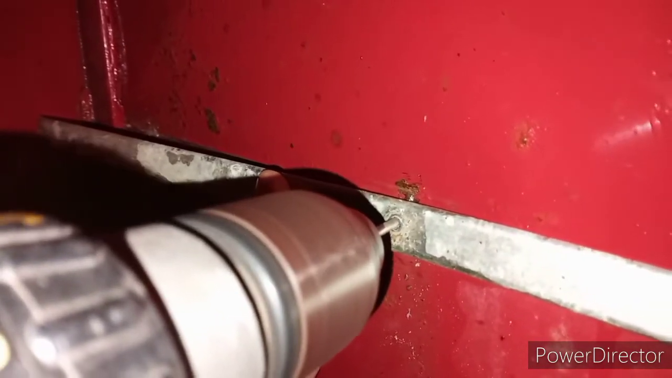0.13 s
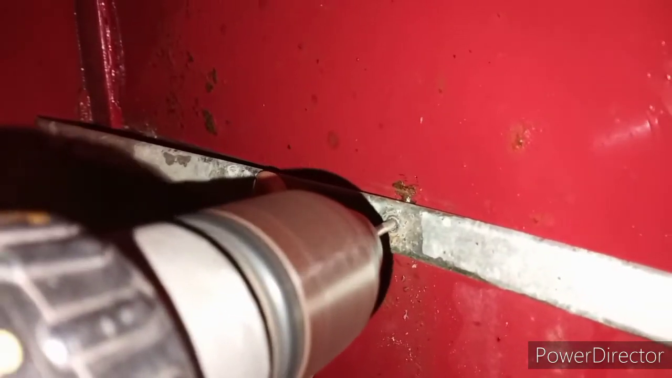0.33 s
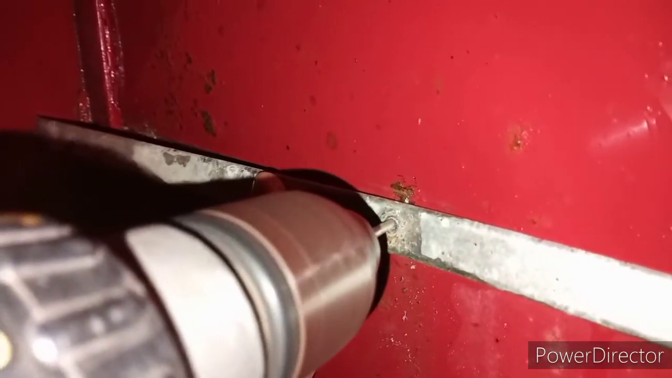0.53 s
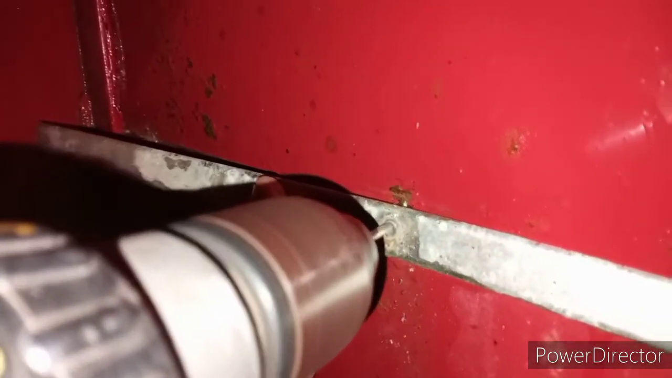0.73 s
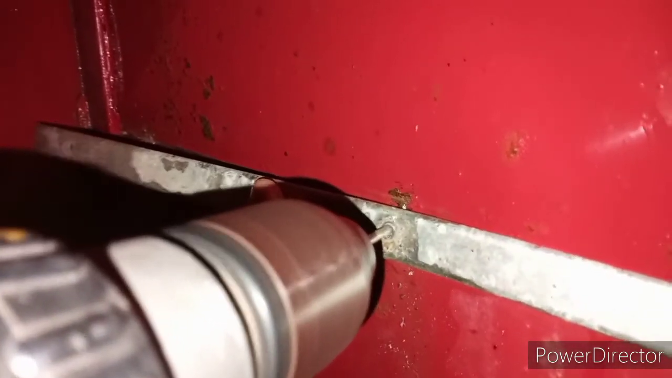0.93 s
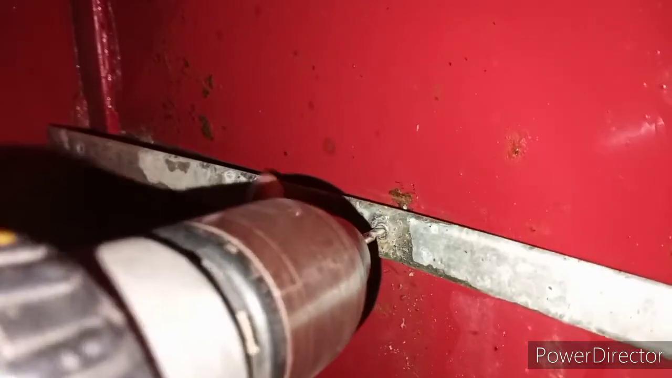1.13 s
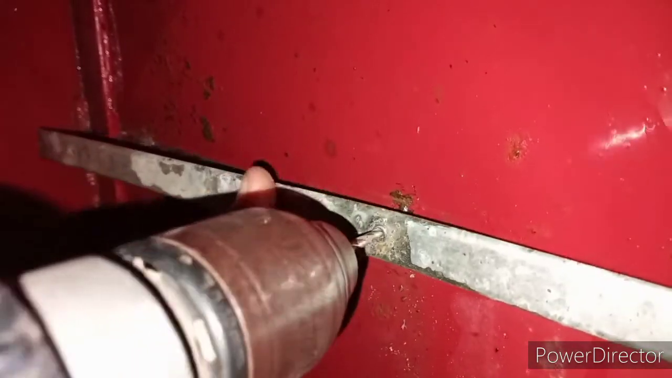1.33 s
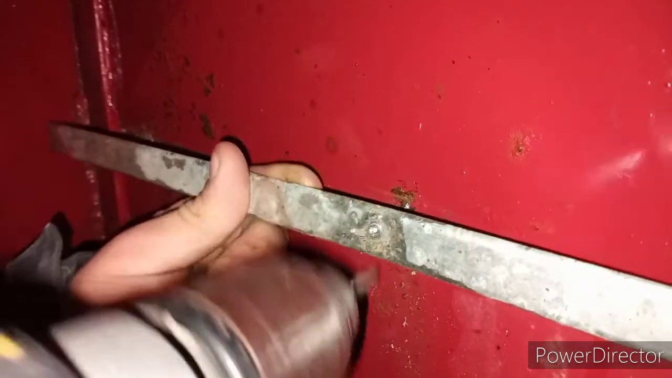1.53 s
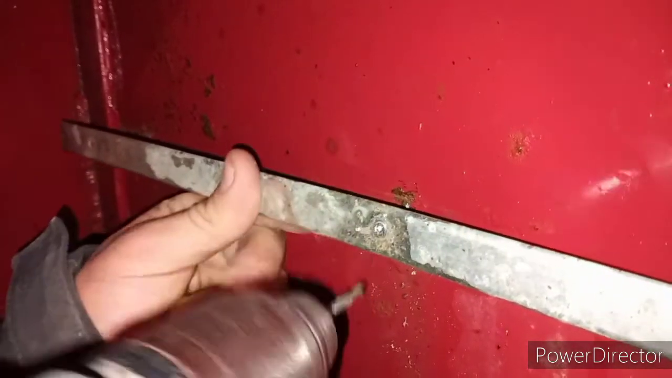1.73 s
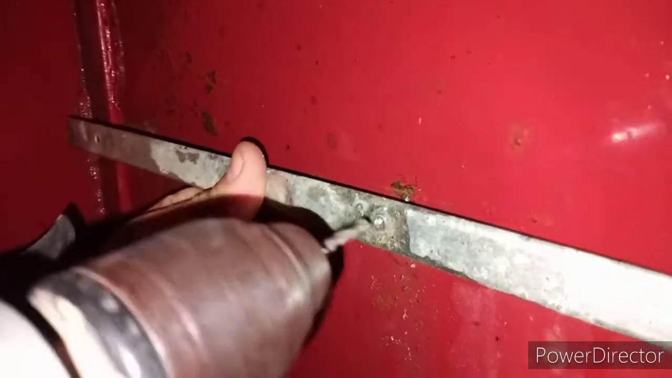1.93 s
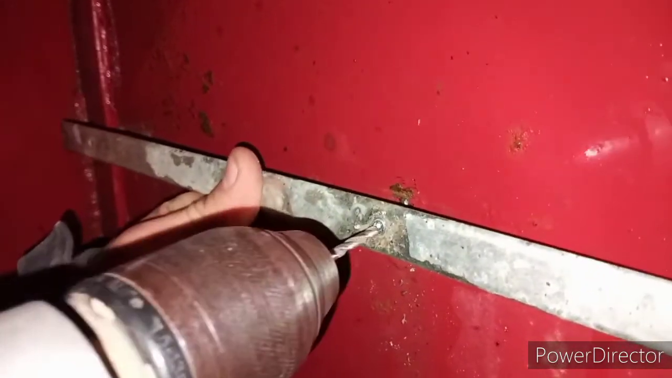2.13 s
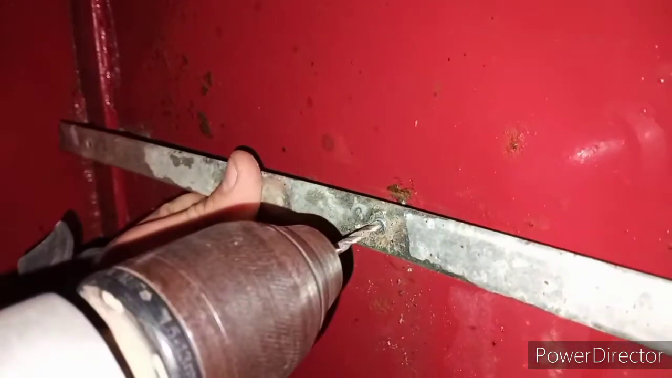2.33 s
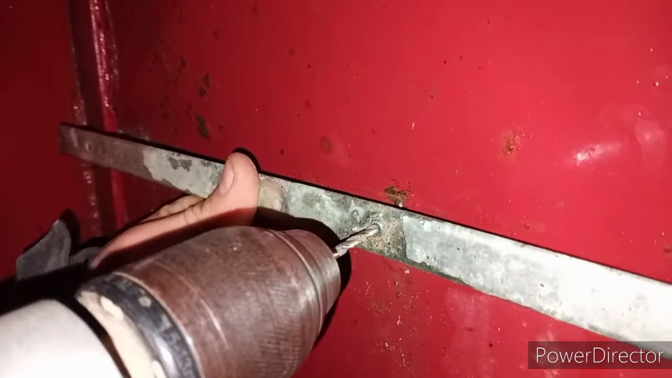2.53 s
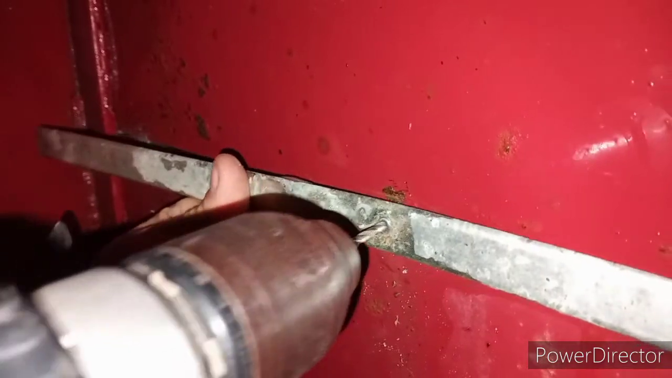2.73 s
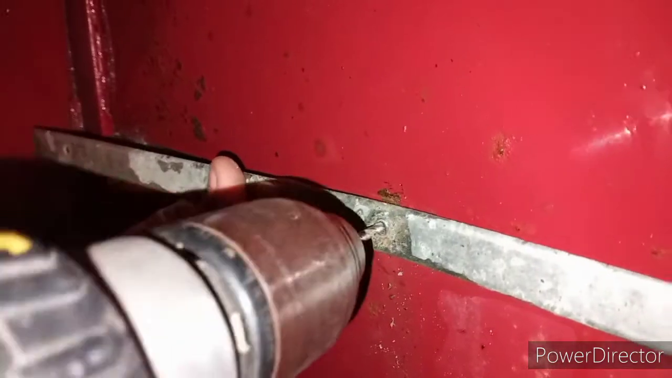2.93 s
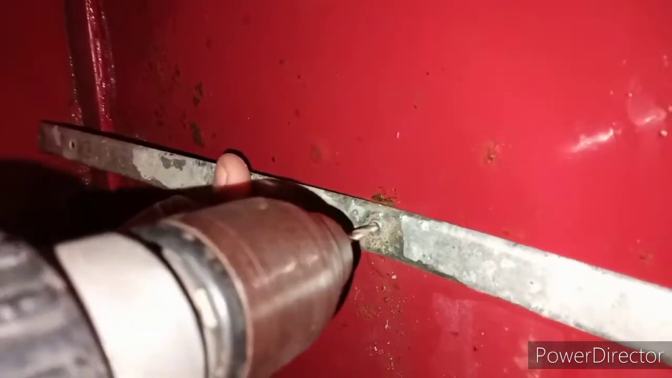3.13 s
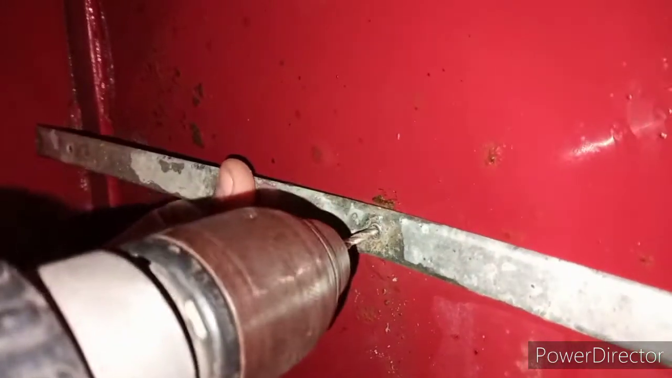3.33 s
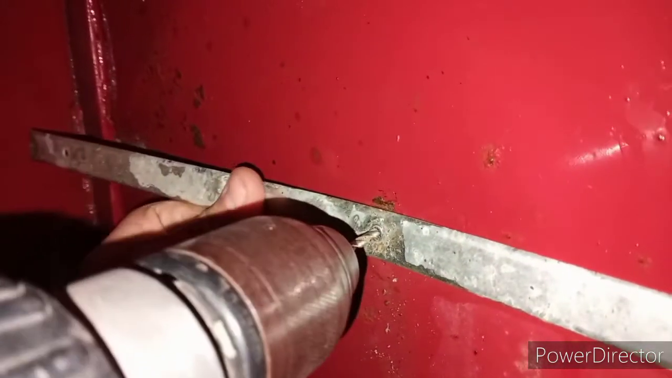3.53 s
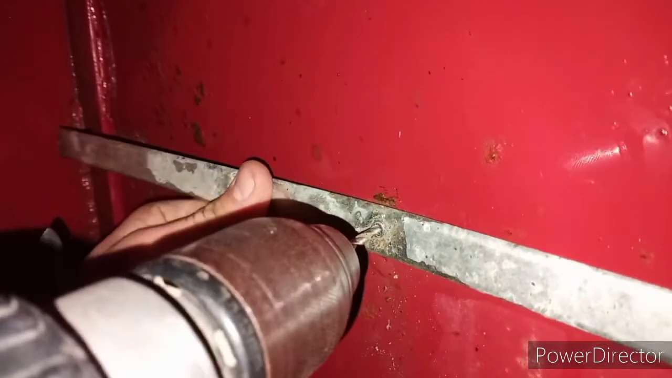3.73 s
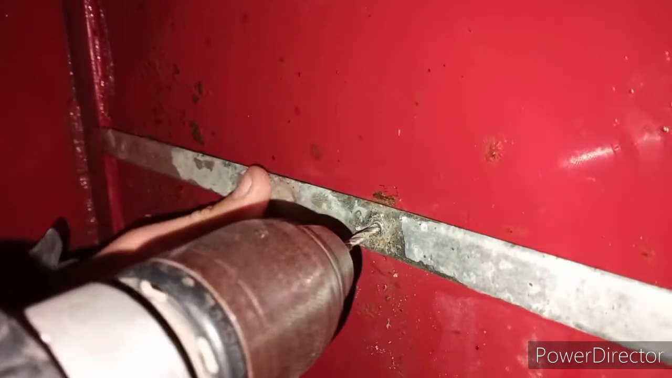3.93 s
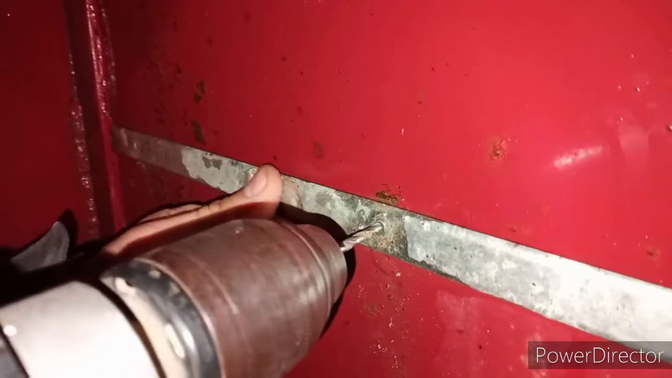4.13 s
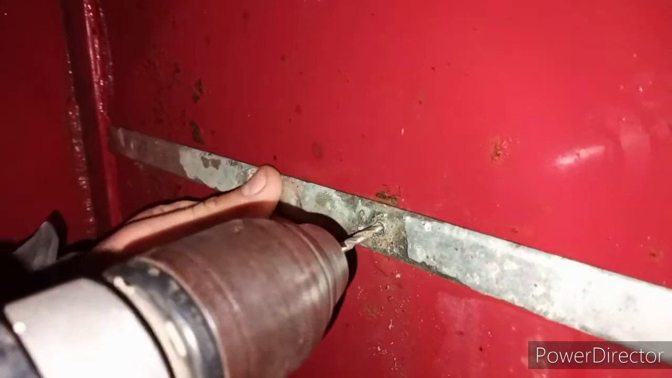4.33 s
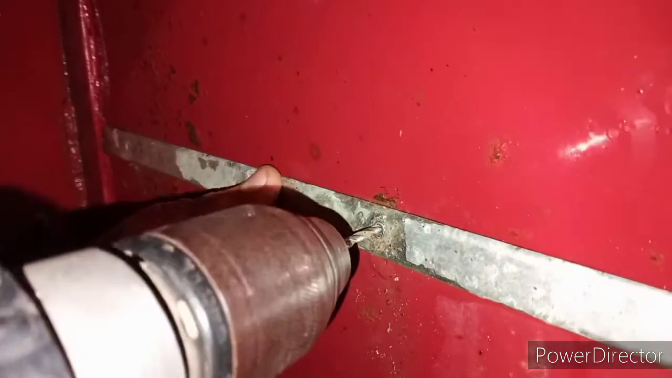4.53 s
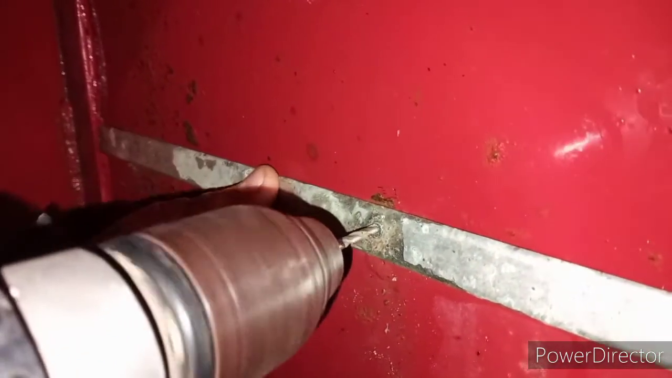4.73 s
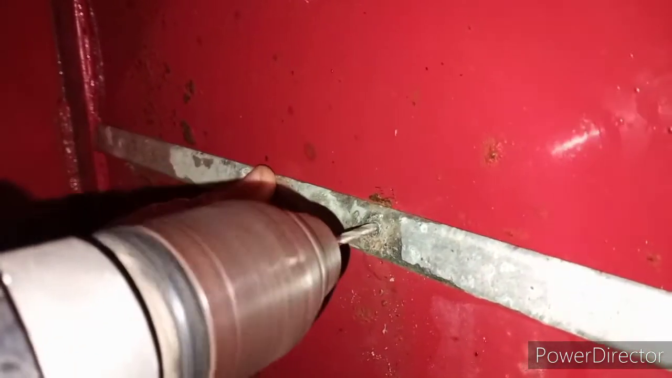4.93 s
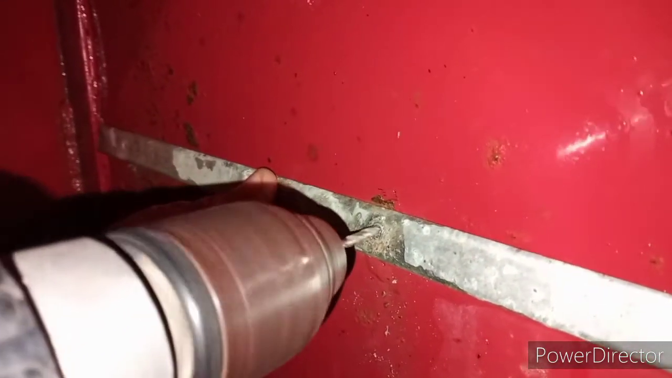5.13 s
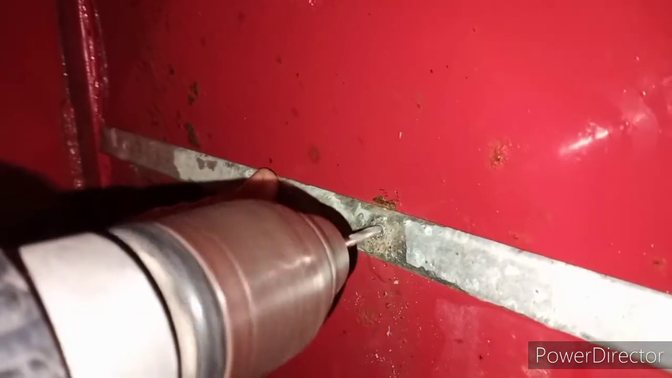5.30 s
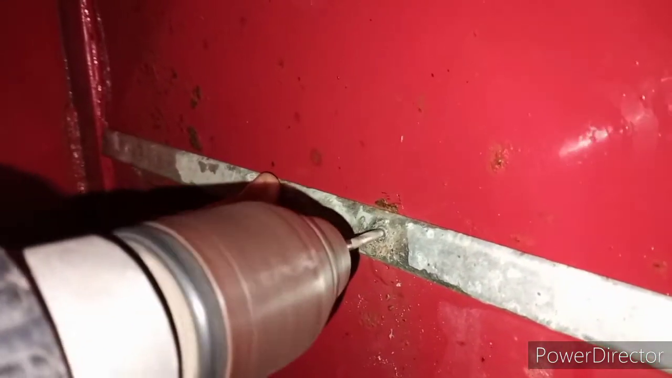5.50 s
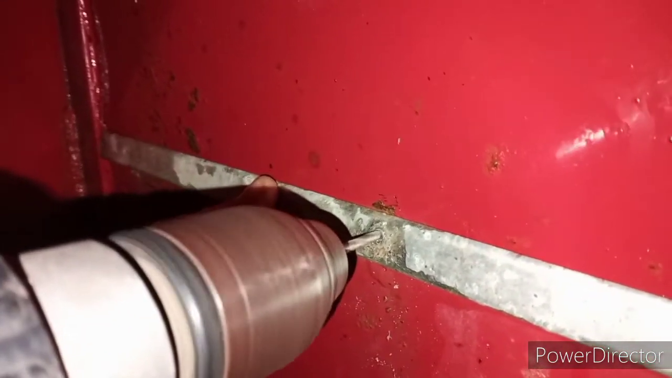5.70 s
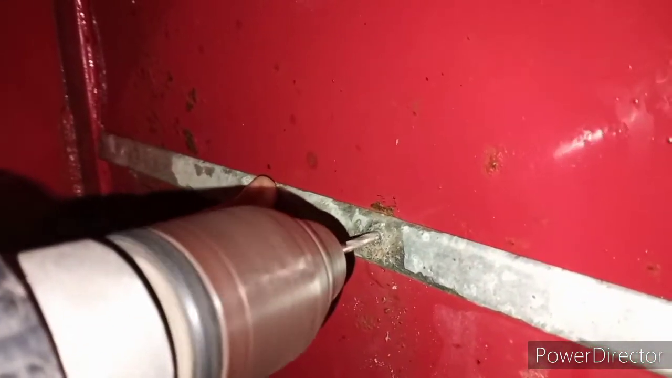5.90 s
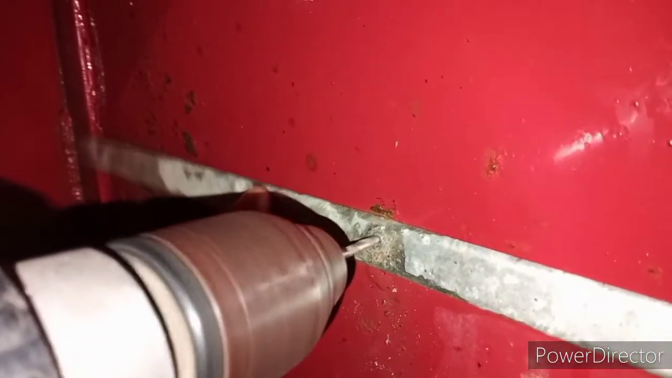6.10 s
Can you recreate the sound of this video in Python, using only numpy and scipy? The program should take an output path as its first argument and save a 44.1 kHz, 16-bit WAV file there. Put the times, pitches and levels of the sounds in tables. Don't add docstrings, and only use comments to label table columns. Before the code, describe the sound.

A cordless drill is already running at 0 s, close to the microphone: a fast, smooth whine under dense gear hiss, sagging slightly under load and recovering, with low panel rumble. Around 0.93 s the brake stops it, with a sharp clack and a cluster of small ticks to 1.1 s. A much quieter pause follows, with faint low hum, cloth and skin rustle, and light scraping. At 1.35 s there is a crisp tap and short squeak as the bit drags; sparse ticks follow near 2.1, 2.6, 3.3 and 3.5 s, and a soft panel thump at 4.2 s. From 4.6 s come hard knocks, a trigger click and a brief upward whistle. At 4.7 s the slow run starts, a rasping, grinding chatter of rapid catches that slows into a low buzz. After 5.3 s it slips, sings high briefly, and the panel shakes and clatters harder, with a thud near 5.9 s, continuing to the end.

```python
import sys
import numpy as np
from scipy import signal
from scipy.fft import rfft, irfft
from scipy.io import wavfile
from scipy.ndimage import uniform_filter1d

SR = 44100
rng = np.random.default_rng(int(sys.argv[2]) if len(sys.argv) > 2 else 0)


def output_pcm(signal):
    pcm = np.clip(np.atleast_2d(signal).T, -1, 1) * 32767
    wavfile.write(sys.argv[1], SR, np.round(pcm).astype(np.int16))


def volts_from_db(level):
    exponent = np.asarray(level, float) / 20
    return 10 ** exponent


N = 271656
T = np.arange(N) / SR


def curves(table, fade_s=0.0064):
    s, *columns = np.transpose(table)
    gate = np.interp(T, [s[0] - fade_s, s[0], s[-1], s[-1] + fade_s], [0, 1, 1, 0])
    return [np.interp(T, s, c) for c in columns] + [gate]


def span(start_s, end_s):
    return curves([(start_s, 0), (end_s, 0)])[1]


def unit(x, gate=1):
    return x / np.sqrt(np.mean(x ** 2 * gate) / np.mean(gate * np.ones(N)))


def colour(x, points):
    hz, db = np.transpose(points)
    size = 8192
    log_hz = np.log(np.maximum(np.arange(size // 2 + 1) * SR / size, 1))
    cepstrum = irfft(np.interp(log_hz, np.log(hz), db) * np.log(10) / 20)
    cepstrum[1:size // 2] *= 2
    cepstrum[size // 2 + 1:] = 0
    response = irfft(np.exp(rfft(cepstrum)))[:size // 2]
    return signal.fftconvolve(x, response)[:N]


def white():
    return rng.standard_normal(N)


def noise(points):
    return unit(colour(white(), points))


def walk(rate_hz):
    k = int(SR / rate_hz)
    held = np.repeat(rng.standard_normal(N // k + 1), k)
    return 1.29 * uniform_filter1d(uniform_filter1d(held, k), k)[:N]


def ring(x, hz, width_hz):
    return signal.lfilter(*signal.iirpeak(hz, hz / width_hz, SR), x)


def rings(x, peaks):
    return unit(sum(volts_from_db(db) * ring(x, hz, width_hz) for hz, width_hz, db in peaks))


def decay(since_s, t60_s):
    return np.exp(-np.log(1000) * since_s / t60_s)


def swells(rows, column=3, shape=0.77, floor_db=-120, soften_s=0):
    floor = volts_from_db(2 * floor_db)
    power = np.full(N, floor)
    for row in rows:
        times = row[:3]
        at = slice(int(min(times) * SR), int(max(times) * SR))
        power[at] += volts_from_db(2 * row[column]) * np.interp(T[at], times, [0, 1, 0]) ** (2 * shape)
    power = uniform_filter1d(power, 1 + int(soften_s * SR))
    return 10 * np.log10(np.maximum(power, floor))


PAUSE_START_S, PAUSE_END_S = 1, 4.7
# (frequency [Hz], level [dB])
HUM_SPECTRUM = [(15, -68.5), (25, -28), (75, -4.5), (91, -0.5), (141, 2), (157, 3), (174, -13), (208, -8),
                (239, -21), (295, -8.5), (325, -19), (430, -22), (700, -32), (910, -33), (1540, -120)]
# (from [s], peak [s], to [s], level [dB])
LEANS = [(.93, .95, 1.0, -32), (.98, 1.07, 1.21, -31), (1.15, 1.25, 1.48, -38.5), (1.42, 1.46, 1.64, -37.5),
         (1.85, 2.03, 2.03, -46), (2.09, 2.12, 2.26, -43), (2.48, 2.6, 2.83, -47), (2.98, 3.2, 3.27, -47.5),
         (3.3, 3.48, 3.64, -36), (3.55, 3.85, 4.3, -40), (4.18, 4.25, 4.4, -34), (4.45, 4.49, 4.75, -41.5)]


def outdoor_hum():
    hum_db = swells(LEANS, floor_db=-47) + 0.96 * walk(9.8)
    return span(PAUSE_START_S, PAUSE_END_S) * volts_from_db(hum_db) * noise(HUM_SPECTRUM)


# (frequency [Hz], level [dB])
RUSTLE_SPECTRUM = [(1180, -41), (2000, -20), (2520, -14), (2960, -16.5), (3310, -14.5), (5820, -5),
                   (6340, -0.5), (8400, -24.5), (9880, -17.5), (13400, -27), (15400, -15.5)]
# (frequency [Hz], level [dB])
AIR_TILT = [(2500, -14), (5000, 1)]
# (frequency [Hz], level [dB])
SCRAPE_SPECTRUM = [(180, -44), (300, -6), (437, -18), (522, -7), (1070, -9.5), (1750, -9), (2090, -13),
                   (5000, -18), (6500, -28), (11000, -120)]
# (frequency [Hz], width [Hz], level [dB])
STRIP_MODES = [(520, 34, -19), (1258, 26, -0.5), (1430, 100, -1), (1770, 71, 5), (1933, 44, 1.5),
               (2700, 70, -23), (3160, 38, 2), (3850, 35, -20)]
# (from [s], peak [s], to [s], cloth rustle [dB], scrape on the strip [dB])
MOVES = [(.94, .95, 1.01, -36, -35), (.99, 1.01, 1.12, -42.5, -37.5), (1.03, 1.14, 1.67, -44, -57.5),
         (1.25, 1.43, 1.51, -43, -44.5), (1.41, 1.51, 1.737, -41.5, -53), (1.72, 1.82, 2.12, -44, -56),
         (1.9, 2.04, 2.2, -49, -54.5), (2.11, 2.15, 2.15, -42, -54), (2.44, 2.56, 2.66, -45, -55.5),
         (2.5, 3.5, 4.5, -46.5, -56.5), (2.57, 2.69, 3.0, -38, -50.5), (3.06, 3.11, 3.27, -41.5, -41),
         (3.14, 3.24, 3.6, -48, -41.5), (3.22, 3.48, 3.56, -41, -34), (3.65, 3.74, 3.7, -39, -52.5),
         (3.95, 4.04, 4.11, -38, -32), (4.05, 4.13, 4.18, -40, -37.5), (4.18, 4.22, 4.44, -40, -50.5),
         (4.24, 4.45, 4.61, -37, -50.5), (4.48, 4.6, 4.7, -34.5, -46)]


def hands():
    rustle_db = swells(MOVES, shape=0.65, soften_s=0.037)
    scrape_db = swells(MOVES, column=4, shape=1.04, floor_db=-78, soften_s=0.016)
    grit = white() * volts_from_db(2.54 * walk(150) + 1.0 * walk(30.45))
    scrape = unit(colour(grit, SCRAPE_SPECTRUM)) + volts_from_db(-2.0) * rings(grit, STRIP_MODES)
    rustle = noise(RUSTLE_SPECTRUM) * volts_from_db(2.9 * walk(25.14) + 0.51 * walk(120))
    air = volts_from_db(-55) * unit(colour(noise(RUSTLE_SPECTRUM), AIR_TILT))
    moving = volts_from_db(rustle_db) * rustle + volts_from_db(scrape_db) * unit(scrape)
    return span(PAUSE_START_S, PAUSE_END_S) * (air + moving)


# (time [s], peak [dB], ring [Hz], treble [dB])
TAPS = [(0.952, -6.5, 4400, 5), (0.964, -20, 2060, 10), (0.98, -22, 3564, -2), (1.0056, -20, 3720, -4),
        (1.0123, -14.5, 2500, 1), (1.0295, -25, 1970, 1), (1.053, -17.5, 4090, -10),
        (1.065, -16.5, 3930, -7), (1.074, -27.5, 4350, 10), (1.3531, -6.5, 6000, -1),
        (2.101, -21, 4900, 5.5), (2.155, -31, 5194, -8), (2.2285, -36, 1838, -17),
        (2.5572, -19.5, 3540, 8.5), (2.6288, -21.5, 3480, 2), (3.2659, -22, 1270, -3),
        (3.3384, -15, 1720, -10), (3.4985, -13, 1400, -4.5), (4.0627, -21, 1770, 0),
        (4.221, -16.5, 2020, 3), (4.2376, -23, 3430, -2), (4.5877, -16, 4150, -3), (4.637, -2, 1720, 0.5),
        (4.6729, -3, 1610, 5), (4.6806, -5.5, 2850, 0),
        (4.6084, -9, 2500, -2)]


def taps():
    out, bright = np.zeros(N), noise(RUSTLE_SPECTRUM)
    for s, db, hz, treble_db in TAPS:
        t60_s = 0.029 * (3000 / hz) ** 0.3
        at = slice(int(s * SR), int((s + .1) * SR))
        fall = decay(T[at] - s, max(t60_s, .004))
        crack = ring(rng.standard_normal(len(fall)), hz, 0.61 * hz)
        out[at] += volts_from_db(db - 11.5) * fall * (crack / crack.std() + volts_from_db(treble_db) * bright[at])
    return out


# (time [s], peak [dB], frequency [Hz], decay T60 [s])
PANEL_BLOWS = [(.99, -38.5, 476, 0.66), (1.042, -24.5, 159.8, 0.33), (1.0, -33, 267, 0.29),
               (3.45, -25, 81.8, 0.36), (3.49, -30, 309, 0.12), (3.659, -34.5, 193, 0.42),
               (3.789, -30.5, 184, .15), (3.802, -38, 319, 0.18), (4.001, -32.5, 259, 0.23),
               (4.22, -24, 76.5, 0.83), (4.222, -17, 111, 0.16), (4.259, -18.5, 76, 0.14),
               (4.71, -15, 151, .25), (4.771, -6.5, 75, .2), (5.331, -11.5, 74, 0.42),
               (5.913, -1, 55, 0.085)]
# (time [s], peak [dB], frequency [Hz], decay T60 [s])
STRIP_BLOWS = [(1.378, -33, 1570, .14), (1.39, -31, 1480, .14), (4.061, -30, 1770, .05),
               (4.062, -33, 1460, .05), (3.498, -30, 1410, .08), (2.229, -43, 1850, .03)]


def struck_modes():
    out = np.zeros(N)
    for s, db, hz, t60_s in PANEL_BLOWS + STRIP_BLOWS:
        at = slice(int(s * SR), int((s + 1.5 * t60_s) * SR))
        since_s = T[at] - s
        out[at] += volts_from_db(db) * decay(since_s, t60_s) * np.sin(2 * np.pi * hz * since_s)
    return out


# (frequency [Hz], width [Hz], level [dB])
BIT_MODES = [(3080, 58, -21), (3890, 90, -16), (5150, 32, 0.5), (5430, 29, -5.5), (5700, 88, -12),
             (6300, 61, 4), (6690, 34, -8.5), (7100, 32, -4), (8590, 36, -22), (9500, 100, -19),
             (11000, 100, -25), (14800, 72, -10.5)]
# (from [s], peak [s], to [s], level [dB])
JERKS = [(1.255, 1.334, 1.36, -33.5), (1.3528, 1.3533, 1.397, -22), (1.358, 1.367, 1.4, -27),
         (1.38, 1.385, 1.397, -21), (1.388, 1.396, 1.417, -21.5)]


def bit_drag():
    grit = white() * volts_from_db(2.6 * walk(300))
    broad_modes = np.multiply(BIT_MODES, [1, 3, 1])
    squeak = rings(grit, broad_modes) + volts_from_db(-21) * unit(colour(grit, RUSTLE_SPECTRUM))
    return volts_from_db(swells(JERKS, shape=0.58)) * squeak


# (time [s], frequency [Hz], level [dB])
SWITCH_GLIDE = [
    (4.594, 5800, -20.5),
    (4.606, 6650, -21),
    (4.62, 6960, -25),
    (4.638, 7100, -38),
]


def switch_whistle():
    hz, whistle_db, gate = curves(SWITCH_GLIDE, 0.0023)
    phase = 2 * np.pi * np.cumsum(hz) / SR
    return gate * volts_from_db(whistle_db) * (np.sin(phase) + volts_from_db(-24) * np.sin(2 * phase))


# (from [s], to [s], frequency [Hz], width [Hz], level [dB])
RUBBING_BOUTS = [
    (5.345, 5.4, 6400, 900, -21),
    (5.93, 6.02, 187, 104, -14.5),
    (5.29, 5.42, 3950, 250, -28),
]


def rubbing():
    out = 0
    for start_s, end_s, hz, width_hz, db in RUBBING_BOUTS:
        song = ring(ring(white(), hz, width_hz), hz, 2 * width_hz)
        out = out + span(start_s, end_s) * volts_from_db(db) * unit(song)
    return out


# (time [s], free rate [Hz], sag [s])
SLIPS = [
    (4.6952, 142.06, .1286),
    (5.2938, 168, .0405),
    (5.4089, 115, .1221),
    (5.8927, 133.88, .704),
]


def chatter():
    loaded_hz = 90.98
    hz = np.zeros(N)
    for s, free_hz, sag_s in SLIPS:
        sagging = loaded_hz + (free_hz - loaded_hz) * np.exp(-np.abs(T - s) / sag_s)
        hz = np.where(T > s, sagging, hz)
    return np.cumsum(hz) / SR


# (from [s], peak [s], to [s], level [dB])
PUSHES = [(4.633, 4.645, 4.8, -17), (4.7, 4.843, 5.05, -14.5), (4.92, 5.1, 5.27, -18),
          (5.25, 5.31, 5.38, -14), (5.36, 5.45, 5.55, -4), (5.5, 5.59, 5.68, -5.5),
          (5.66, 5.76, 5.82, -11.5), (5.82, 5.89, 5.92, -6.5), (5.94, 5.962, 5.985, -14.5),
          (5.985, 6.01, 6.04, -15), (6.04, 6.09, 6.17, -10.5)]
# (from [s], peak [s], to [s], second harmonic [dB], third harmonic [dB])
JOLTS = [(4.9, 5.15, 5.3, -30, -28), (5.31, 5.381, 5.41, -17, -43), (5.42, 5.469, 5.55, -15, -27),
         (5.56, 5.595, 5.61, -13, -11.5), (5.64, 5.7, 5.94, -19, -28), (5.76, 5.813, 5.855, -13.5, -15),
         (5.86, 5.9, 5.75, -17, -24), (5.93, 5.98, 6.01, -16, -35), (6.0, 6.05, 6.25, -11, -36)]


def panel_shake(beat):
    push_db = swells(PUSHES, shape=0.58)
    second_db = swells(JOLTS, shape=0.85)
    third_db = swells(JOLTS, column=4, shape=1.15)
    lock_s = 4.8064
    swing = np.where(T > lock_s, beat, beat[int(lock_s * SR)] + 105 * (T - lock_s))
    cycle = swing[0] + np.cumsum(uniform_filter1d(np.gradient(swing), size=1500))
    shake = 0
    for k, db, lag in [(1, push_db, .21), (2, second_db, .13), (3, third_db, .12)]:
        level = 1.53 * volts_from_db(db + 1.07 * k * walk(35))
        shake = shake + level * np.cos(2 * np.pi * k * (cycle - lag))
    loose = volts_from_db(push_db - 8.5) * unit(ring(white(), 111.0, 80.0))
    return shake + loose


# (time [s], level [dB])
SECOND_CATCH = [
    (5.33, -39),
    (5.36, -2),
    (6.16, -3),
]


def catch_bursts(beat):
    count = beat.astype(int)
    since = np.arange(N) - np.searchsorted(count, count)
    skip_db = np.interp(T, *np.transpose(SECOND_CATCH)) * (count % 2)
    size = volts_from_db(0.2 * rng.standard_normal(N // 100)[count] + skip_db)
    pulse = np.exp(-since / SR / 0.0026) - np.exp(-since / SR / 0.00028)
    return size * pulse * (beat > 0), count, since


# (frequency [Hz], level [dB])
CATCH_SPECTRUM = [(180, -14.5), (300, -25), (1000, -14.5), (1500, -5), (2060, -1.5), (3500, -1), (4500, -1),
                  (6600, 2), (8400, -10), (12800, -8), (14200, -8.5), (15400, -3)]
# (frequency [Hz], width [Hz], level [dB])
WALL_MODES = [(1632, 85, -4), (1983, 240, -4), (2380, 250, -9.5), (2740, 99, -5.5), (3885, 32, -4.5),
              (4330, 110, -14), (6680, 180, 5.5)]


def catching(burst, count, since, cutting):
    sweep = 0.44 * np.sin(2 * np.pi * 5000 * .003 * (1 - np.exp(-since / SR / 0.002975)))
    edge = sweep + 1.9 * (since == 20)
    chips = np.sign(white())
    worn = chips[since + 997 * (count // 5)]
    strike = burst * (edge + .65 * worn + 0.8 * chips)
    direct = unit(colour(strike, CATCH_SPECTRUM), cutting)
    return direct + volts_from_db(-8.5) * unit(rings(strike, WALL_MODES[:-1]), cutting)


# (frequency [Hz], level [dB])
GRIND_SPECTRUM = [(180, -27.5), (300, 3), (378, -20), (517, -8.5), (590, -18), (651, -8), (1070, -20),
                  (1960, -17), (3060, -15), (6650, -10.5), (8230, -28), (12400, -27), (15400, -17.5)]


def grinding():
    body = noise(GRIND_SPECTRUM) + volts_from_db(-15.5) * rings(white(), WALL_MODES)
    flutes = unit(ring(ring(white(), 6600., 920.0), 6580.0, 1240.0))
    return body * volts_from_db(1.19 * walk(60) + 1.52 * walk(20)) + volts_from_db(-4.0 + 4.34 * walk(90)) * flutes


def panel_clatter(burst, count, cutting):
    uneven = burst * volts_from_db(5 * rng.standard_normal(N // 100)[count])
    knock = unit(ring(uneven, 564.0, 342.0), cutting)
    return knock + volts_from_db(-5) * unit(ring(white(), 400.0, 500.))


# (from [s], cutting [dB], catch over grind [dB], panel clatter [dB])
STAGES = [
    (4.69, -17.5, 3, -37),
    (4.79, -17.5, 5, -43),
    (4.95, -19, 4, -44),
    (5.33, -16.5, 1, -21.5),
    (5.62, -15, 2, -17.5),
    (5.9, -16, 0.5, -11.5),
]
# (from [s], peak [s], to [s], level [dB])
GOUGES = [
    (4.7, 4.714, 4.75, -17.5),
]


def slow_run():
    start, *levels = np.transpose(STAGES)
    stage = np.maximum(np.searchsorted(start, T) - 1, 0)
    slew = int(0.036 * SR)
    cut_db, catch_db, clatter_db = (uniform_filter1d(db[stage], slew) for db in levels)
    cutting = span(start[0], T[-1])
    beat = chatter()
    burst, count, since = catch_bursts(beat)
    grind = grinding()
    share = volts_from_db(catch_db)
    cut = (share * catching(burst, count, since, cutting) + grind) / np.sqrt(1 + share ** 2)
    clatter = volts_from_db(clatter_db - 7) * panel_clatter(burst, count, cutting)
    return panel_shake(beat) + cutting * (volts_from_db(cut_db) * cut + volts_from_db(swells(GOUGES)) * grind + clatter)


# (time [s], rate [Hz])
SHAFT_SPEED = [
    (0, 244),
    (.1, 239.5),
    (.2, 237.2),
    (.33, 229.3),
    (.5, 227.8),
    (.72, 230.8),
    (.88, 236.7),
    (.93, 227),
    (1, 200.7),
]
# (multiple of shaft speed [1], level [dB])
MOTOR_ORDERS = [(1, 3.5), (2, -6), (3, 3.5), (6, 1), (7, 1), (11, -2), (13, -2), (15, 0), (22, -2), (26, 3)]
# (frequency [Hz], level [dB])
GEAR_SPECTRUM = [(180, -30), (300, -7), (619, -7.5), (695, -5.5), (876, -8), (1610, -7), (2130, -8),
                 (2920, -9), (4550, -8), (6020, -6.5), (7100, -4), (8230, -16.5), (12200, -17),
                 (15400, -12)]
# (frequency [Hz], width [Hz], level [dB])
HOUSING_MODES = [(2572, 22, -7), (3008, 31, -1), (3380, 96, -6), (3935, 120, -9.5), (4900, 160, -13),
                 (5900, 140, -1), (6490, 410, -3.5)]
# (frequency [Hz], level [dB])
RUMBLE_SPECTRUM = [(15, -67), (25, -36), (81, 0), (155, 0.5), (194, -1.5), (227, -0.5), (281, -7.5),
                   (454, -9), (600, -14), (780, -40), (1320, -120)]
# (from [s], peak [s], to [s], level [dB])
SHUDDER = [
    (.76, .91, 0.93, -18.5),
]


def fast_run():
    braked_s = np.maximum(T - .934, 0)
    hiss_db = -11.5 - 1.5 * T - 480 * braked_s
    rumble_db = swells(SHUDDER, floor_db=-20.5) - 700 * braked_s
    turn = np.cumsum(curves(SHAFT_SPEED)[0] * (1 + 0.0019 * walk(30))) / SR
    whine = sum(volts_from_db(db + 2 * walk(11.1)) * np.sin(2 * np.pi * k * turn) for k, db in MOTOR_ORDERS)
    mesh = 1 + 0.17 * np.cos(2 * np.pi * turn)
    wobble = volts_from_db(0.62 * np.sin(2 * np.pi * turn / 17) + 0.55 * walk(40))
    gears = noise(GEAR_SPECTRUM) + volts_from_db(-6) * rings(white(), HOUSING_MODES)
    drill = volts_from_db(hiss_db) * (gears * mesh * wobble + volts_from_db(-9) * unit(whine))
    rumble = volts_from_db(rumble_db + 2.0 * walk(25)) * noise(RUMBLE_SPECTRUM)
    return span(0, 1.0) * (drill + rumble)


def scene():
    surroundings = outdoor_hum() + hands()
    contacts = taps() + struck_modes() + bit_drag() + switch_whistle() + rubbing()
    return np.tile(surroundings + contacts + slow_run() + fast_run(), (2, 1))


def top_cut(x):
    return signal.sosfilt(signal.butter(12, 16870, fs=SR, output="sos"), x)


def record(dry):
    x = dry + volts_from_db(7.0) * ring(ring(dry, 14900., 1300.), 16200.0, 1300.)
    x = signal.sosfilt(signal.butter(2, 45, "high", fs=SR, output="sos"), x)
    x = np.tanh(1.15 * x) / 1.15
    x = signal.sosfilt(signal.ellip(12, .3, 75, 15520, fs=SR, output="sos"), x)
    return top_cut(x)


dry = scene()
out = record(dry)
output_pcm(out)
```